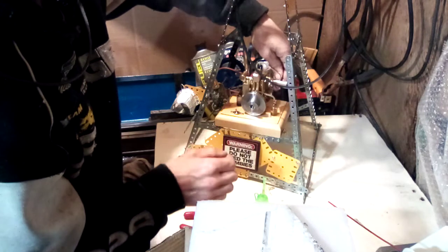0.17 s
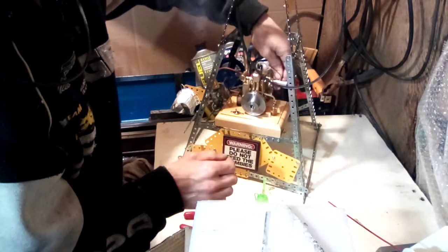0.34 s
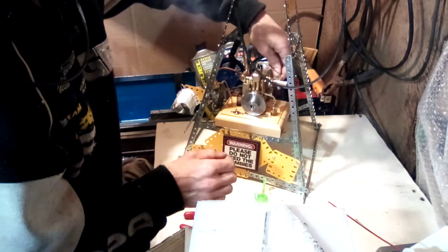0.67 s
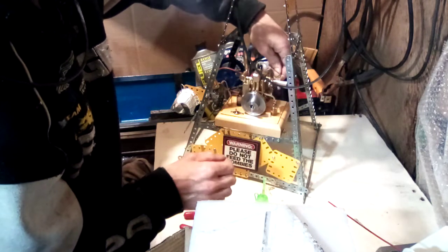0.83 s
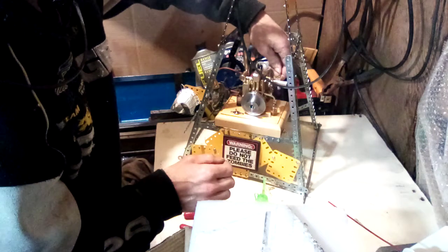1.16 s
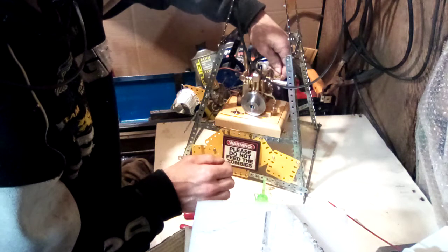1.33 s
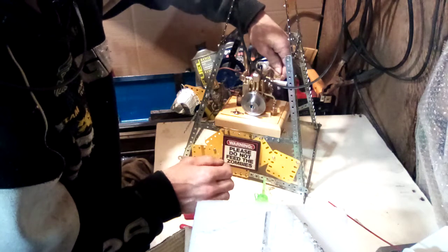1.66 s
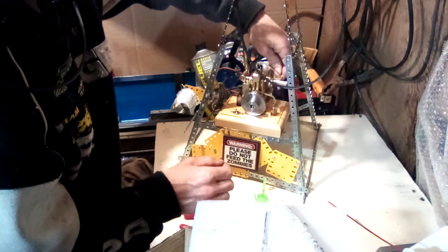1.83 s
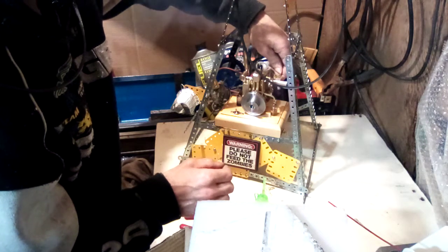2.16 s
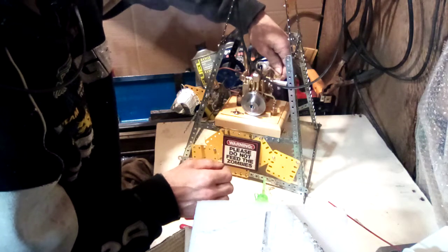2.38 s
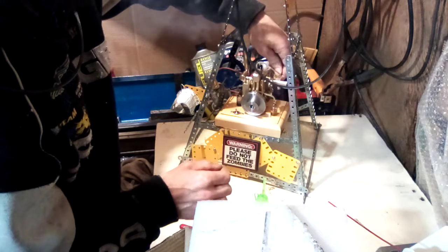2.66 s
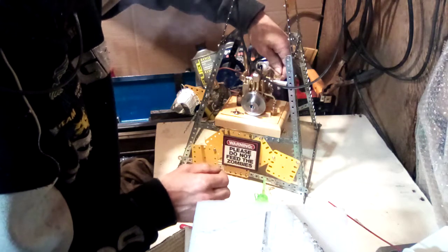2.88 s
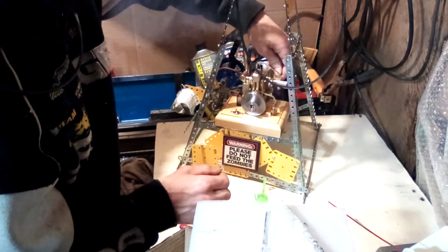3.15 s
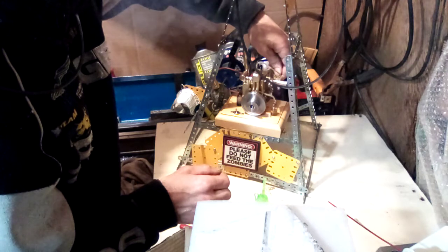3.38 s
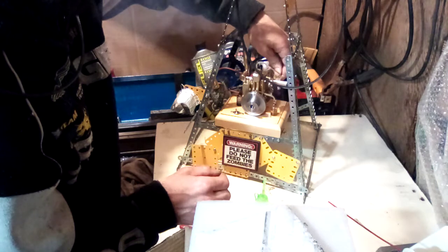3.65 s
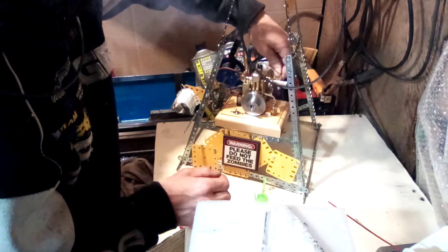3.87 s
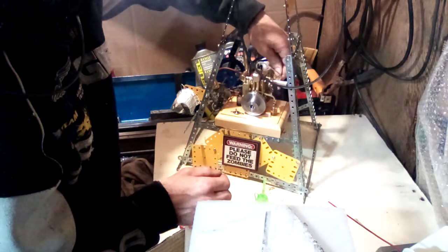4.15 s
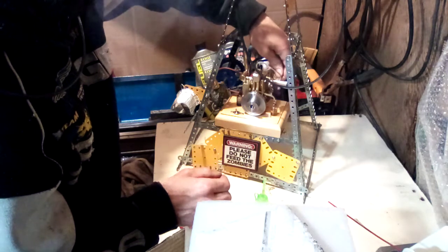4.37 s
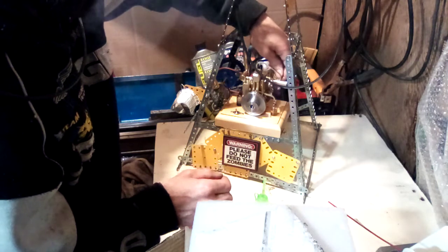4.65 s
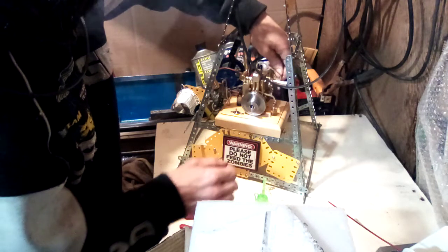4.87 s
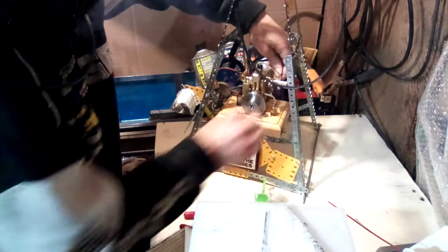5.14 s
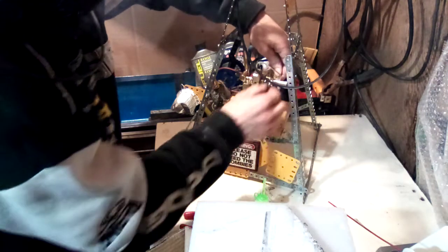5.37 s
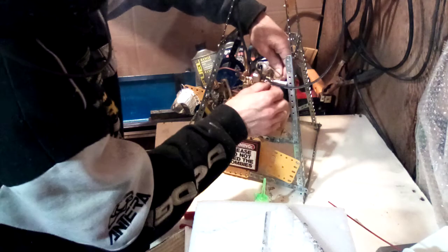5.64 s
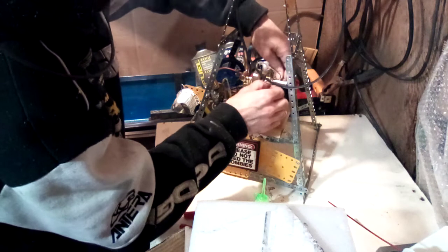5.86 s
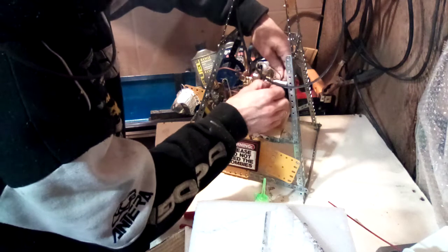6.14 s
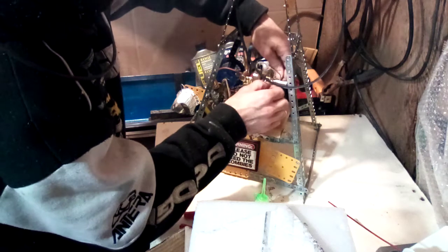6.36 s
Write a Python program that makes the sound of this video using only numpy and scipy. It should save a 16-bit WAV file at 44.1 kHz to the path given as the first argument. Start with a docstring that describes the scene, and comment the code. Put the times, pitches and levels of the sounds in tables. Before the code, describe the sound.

A small model four-stroke engine runs on a workbench, heard close up in a tight workshop corner with short reflections and faint background noise. Each firing gives a sharp, slightly hollow bark with a metallic ring, while the missed cycles only puff and tick. The intake adds a pulsing hum and hiss, and the bench rumbles low underneath. For the first second or so the engine sputters irregularly. From about 1.2 seconds it settles into a faster, more even putter, with brief flurries of rapid firing around 2, 2.8 and 3.7 seconds. The speed sags and the rhythm stumbles around 4.7 seconds. At 5 seconds it stops firing and coasts down with soft, slowing puffs and ticks. At about 5.9 seconds it catches again, giving a few slower, uneven pops until the end at around 6.6 seconds.

```python
"""A model four-stroke engine runs unevenly on a workbench in a tight corner of a workshop.
Each cycle releases a pressure pulse that excites the gas resonances, and the valve rings the metal:
cycles that fire bark sharply, the others only puff and tick. The intake draws air with a hum and a hiss.
Near the end the engine stops firing, coasts down and catches again. The bench rumbles in forced
vibration, and the close walls add early reflections."""
import sys
import numpy as np
from scipy import signal
from scipy.fft import rfft, irfft
from scipy.io import wavfile

SR = 44100
rng = np.random.default_rng(int(sys.argv[2]) if len(sys.argv) > 2 else 0)


def unload_wav(signal):
    """Save mono or channel-first audio to the path in sys.argv[1] as 16-bit WAV at rate SR, clipped to [-1, 1]."""
    wavfile.write(
        sys.argv[1],
        SR,
        np.round(np.clip(np.atleast_2d(signal).T, -1, 1) * 32767).astype(np.int16),
    )


N = 287091
TIME = np.arange(N) / SR
CUTOFF_HZ = 16200
CRUISE_CYCLES_PER_S = 24
# speed laws: (level_at_cruise_db, db_per_doubling_of_speed)
FIRE_PUFF, MISS_PUFF, MISS_RING = (2.16, 3.9), (-7.5, 1.7), (-5.5, -2.5)
HUM_LAW, HISS_LAW, CHUFF_LAW = (-21.5, 15.6), (-45, 5.8), (-37.5, 0)
HOOT_LAW, SPIT_LAW = (-23.5, -7.5), (-35, 1.4)


def from_db(db):
    """Decibels to amplitude ratio."""
    return 10 ** (np.asarray(db) / 20)


def curve(rows, at):
    """Linear interpolation in a two-column table."""
    return np.interp(at, *np.transpose(rows))


def uneven(db, scatter_db):
    """Cycle-to-cycle variation: bounded Gaussian scatter of the levels."""
    return db + scatter_db * np.clip(rng.standard_normal(len(db)), -2, 2)


def noise(spectrum):
    """White noise shaped to a spectrum, at rms 1."""
    hz, db = np.transpose(spectrum)
    bins_hz = np.maximum(np.arange(N // 2 + 1) * SR / N, 1)
    gain = from_db(np.interp(np.log(bins_hz), np.log(hz), db))
    shaped = irfft(rfft(rng.standard_normal(N)) * gain, N)
    return shaped / np.sqrt(np.mean(shaped ** 2) + 1e-20)


def resonate(x, hz, width_hz):
    """A damped resonator with unit peak gain."""
    r = np.exp(-np.pi * width_hz / SR)
    feedback = [1, -2 * r * np.cos(2 * np.pi * hz / SR), r * r]
    return signal.lfilter(np.array([1, 0, -1]) * (1 - r * r) / 2, feedback, x)


def soften(x, cut_hz):
    """A second-order low-pass."""
    return signal.sosfilt(signal.butter(2, cut_hz, fs=SR, output="sos"), x)


def clicks(times, db):
    """One impulse at each time."""
    out = np.full(N + SR, 1e-18)
    out[np.round(times * SR).astype(int)] = from_db(db)
    return out[:N]


def strikes(times, db, cut_hz):
    """Rounded pulses: the longer a pulse, the less treble it holds."""
    return soften(clicks(times, db), cut_hz)


def since(times):
    """Index of the latest event at each sample, and its age in seconds."""
    latest = np.maximum(np.searchsorted(times, TIME) - 1, 0)
    return latest, np.maximum(TIME - times[latest], 0)


# spells of one firing rhythm: start_s, firings, cycles_per_firing, speed_change_share_per_cycle
FIRING_SPELLS = [(0.0147, 1, 4, -0.04), (0.2151, 1, 3, -0.036), (0.3737, 2, 2, 0.015),
                 (0.5813, 1, 3, -0.027), (0.7323, 2, 2, 0.029), (0.922, 1, 3, -0.026),
                 (1.0592, 2, 2, 0.012), (1.237, 10, 2, 0.0064), (2.0161, 2, 1, 0.0028),
                 (2.0871, 10, 2, 0.00032), (2.789, 5, 1, -0.0065), (2.9673, 9, 2, -0.0011),
                 (3.6091, 1, 2, 0.025), (3.6839, 1, 1, 0.004), (3.7203, 11, 2, -.0062),
                 (4.6223, 2, 1, -.01), (4.7053, 1, 3, -.023), (4.8337, 2, 2, -.012),
                 (5.0024, 1, 15, -.0331), (5.8816, 1, 2, -.032), (6.0326, 1, 2, -0.0056),
                 (6.174, 1, 3, -0.045), (6.3747, 1, 2, -0.0049), (6.5, 1, 2, 0)]

def cycles(last_end_s=6.62):
    """Period is the inverse of speed: exhaust valve opening times, and whether each cycle fires."""
    times, fires = [], []
    ends = [row[0] for row in FIRING_SPELLS[1:]] + [last_end_s]
    for (start, firings, every, change), end in zip(FIRING_SPELLS, ends):
        cycle = np.arange(firings * every)
        period = 1 / (1 + change * cycle)
        times.extend(start + (end - start) * (np.cumsum(period) - period) / period.sum())
        fires.extend(cycle % every == 0)
    return np.array(times), np.array(fires)


def by_speed(law, times):
    """Amplitude follows a power law of engine speed: the level in dB at these times."""
    cruise_db, db_per_doubling = law
    starts, _ = cycles()
    speed = np.interp(times, (starts[1:] + starts[:-1]) / 2, 1 / np.diff(starts))
    return cruise_db + db_per_doubling * np.log2(speed / CRUISE_CYCLES_PER_S)


# spectrum of the workshop's background: frequency_hz, density_db
BACKGROUND_SPECTRUM = [(50, -23.5), (150, 4.5), (300, 11), (800, -1.5), (1500, -5.5), (3500, -15.5),
                       (7000, -20.5), (9000, -72), (16000, -48)]

def background():
    """Stationary broadband noise sets the room's noise floor."""
    return from_db(-45.5) * noise(BACKGROUND_SPECTRUM)


# modes of the bench top: pitch_hz, width_hz, level_db
BENCH_MODES = [(113, 47, 25), (164, 19, 26.5)]
# low modes of the engine's frame: pitch_hz, width_hz, level_db
FRAME_MODES = [(61.8, 20.5, -3.5), (84.8, 38, 4.5), (138.6, 26, -1), (166.3, 41, 3)]
# spectrum of the bench's rumble: frequency_hz, density_db
RUMBLE_SPECTRUM = [(20, -45), (40, -58), (58, 2), (80, -0.5), (100, 4.5), (125, 1), (150, -3.5),
                   (175, -6.5), (210, -11.5), (400, -35), (2000, -48)]
# strength of the bench's shaking: time_s, level_db
BENCH_SHAKE = [(0.0, -44.5), (1.34, -37.5), (2.95, -47), (3.02, -40.5), (3.78, -44), (4.78, -40.5),
               (5.83, -50.5), (5.87, -45), (6.46, -43), (6.5, -41)]

def bench(starts, fired):
    """Forced vibration: every firing kicks the bench and every cycle rocks it, over a faint rumble."""
    kicks = strikes(fired, by_speed(FIRE_PUFF, fired) - 14, cut_hz=162)
    thud = sum(from_db(db) * resonate(kicks, hz, width) for hz, width, db in BENCH_MODES)
    rocks = strikes(starts, 54.5, cut_hz=162)
    drone = sum(from_db(db) * resonate(resonate(rocks, hz, width), hz, width)
                for hz, width, db in FRAME_MODES)
    rumble = from_db(-1) * noise(RUMBLE_SPECTRUM)
    return thud + from_db(curve(BENCH_SHAKE, TIME)) * (drone + rumble)


def workshop(x, t60_s, wet_db):
    """Reverberation: a diffuse tail sets in after 6 ms and decays exponentially."""
    age = TIME[:SR // 2]
    onset = np.clip((age - .006) / 0.00067, 0, 1)
    tail = rng.standard_normal(len(age)) * from_db(-60 * age / t60_s) * onset
    return x + from_db(wet_db) * signal.fftconvolve(x, tail / np.linalg.norm(tail))[:N]


# reflections from bench, frame and near walls: delay_ms, signed_gain
REFLECTIONS = [(0.82, 0.16), (1.07, 0.7), (1.4, -0.34), (1.87, 0.42), (3.02, 0.33), (4.05, -0.42),
               (4.28, -0.42), (5.48, -0.59), (6.24, -0.15), (6.5, 0.58), (8.68, 0.086), (9.81, 0.079),
               (10.82, -0.3), (12.01, 0.047)]

def corner(x, dull_hz):
    """Comb filtering: duller copies from close, hard surfaces interfere with the direct sound."""
    dull = soften(x, dull_hz)
    samples = np.arange(N)
    return x + sum(gain * np.interp(samples + 2 - ms * SR / 1000, samples, dull, left=0)
                   for ms, gain in REFLECTIONS)


def intake_hum(inlet, phase, pitch_hz):
    """Helmholtz resonance: drawn air hums like a bottle, at a slightly different pitch each stroke."""
    stroke, _ = since(inlet)
    hz = pitch_hz * (1 + 0.0075 * rng.standard_normal(len(inlet)))[stroke]
    swell = np.exp(-((phase - 0.33) / 0.23) ** 2)   # loudest in mid-stroke
    tone = swell * np.sin(2 * np.pi * np.cumsum(hz) / SR)
    return soften(resonate(tone, pitch_hz, width_hz=164), cut_hz=6900)


# spectrum of the inlet valve's chuff: frequency_hz, density_db
CHUFF_SPECTRUM = [(500, -29), (2800, -2.5), (4300, -10.5), (5000, -3), (5450, 8), (6200, -24), (7000, 2),
                  (7600, -6), (8200, -23.5), (10200, -13.5), (11500, -63), (16000, -36)]

def inlet_chuff(inlet, t60_s):
    """A flow transient: each opening of the inlet valve starts an exponentially decaying noise."""
    openings = clicks(inlet, by_speed(CHUFF_LAW, inlet))
    decay = signal.lfilter([1], [1, -from_db(-60 / (t60_s * SR))], openings)
    return soften(decay, cut_hz=2100) * noise(CHUFF_SPECTRUM)   # the valve lifts gradually


# spectrum of the intake hiss: frequency_hz, density_db
HISS_SPECTRUM = [(300, -5), (1000, 7.5), (1270, 9.5), (1520, -1), (2030, 10), (2300, 7), (3600, 6),
                 (4500, -5), (5500, -7), (6200, -2), (7500, -7), (8200, -33), (10000, -24), (14500, -18)]
# intake air flow over one cycle: cycle_share, level_db
INTAKE_FLOW = [(0, 1), (0.206, 7), (0.231, 10.5), (.3, -2.5), (.45, 5), (.62, -1.5), (.8, -15), (1, 1)]
# how freely the intake draws, choked while the engine coasts: time_s, level_db
THROTTLE_OPENING = [(0, 1), (.6, -1), (2, -1), (3, -0.5), (4.3, -2.5), (5, -2), (5.35, -5.5), (5.8, -16),
                    (6.2, -9), (6.5, -9)]

def intake(starts):
    """Flow noise grows with speed and throttle: returns the hum, and the hiss with the valve's chuff."""
    phase = np.interp(TIME, starts, np.arange(len(starts))) % 1
    inlet = starts[:-1] + .215 * np.diff(starts)   # opens after the exhaust stroke
    throttle_db = curve(THROTTLE_OPENING, TIME)
    hum = from_db(by_speed(HUM_LAW, TIME) + throttle_db) * intake_hum(inlet, phase, pitch_hz=820)
    hiss_db = by_speed(HISS_LAW, TIME) + 0.56 * throttle_db + curve(INTAKE_FLOW, phase)
    hiss = from_db(hiss_db) * noise(HISS_SPECTRUM)
    return hum, hiss + inlet_chuff(inlet, t60_s=0.034)


# notes of the emptied cylinder: start_hz, end_hz, level_db, length_s
CYLINDER_NOTES = [(793.6, 832, 2, 0.074), (694, 735, -4.5, 0.088), (603, 652, 0, 0.051)]

def cylinder_hoot(fired, glide_s, swell_s):
    """Cavity resonance: the cylinder rings on after a firing, its notes climbing as the piston rises."""
    _, age = since(fired)
    notes = 0
    for start_hz, end_hz, db, length_s in CYLINDER_NOTES:
        turns = end_hz * age - (end_hz - start_hz) * glide_s * (1 - np.exp(-age / glide_s))
        notes += from_db(db - 60 * (age / length_s) ** 2) * np.sin(2 * np.pi * turns)
    swell = 1 - np.exp(-(age / swell_s) ** 2)
    return from_db(by_speed(HOOT_LAW, TIME)) * swell * notes


# how hard the charge burns: time_s, crack_db, ring_db
BURN_STRENGTH = [(0, -15.5, -0.5), (.5, -35, 2.5), (.75, -35, 3), (1, -20.5, -1), (1.601, -22, -1.5),
                 (2.6, -18.5, 1), (2.95, -22, -2), (3.5, -17, 3.5), (3.8, -19, -1), (4.6, -17.5, -1),
                 (4.999, -19.5, -0.5), (5.9, -38, -4), (6.5, -31, -3.5)]

def burn(fired):
    """Combustion strength sets each firing's exhaust crack and metal ring, in dB."""
    time_s, crack_db, ring_db = np.transpose(BURN_STRENGTH)
    return np.interp(fired, time_s, crack_db), np.interp(fired, time_s, ring_db)


# misses in which a little charge still burns: time_s, boost_db
PARTIAL_BURNS = [(1.98, 7), (2.19, 6), (3.65, 6.5)]

def partial_burn(missed):
    """Incomplete combustion strengthens a few misses: extra dB for each miss."""
    index = np.arange(len(missed))
    return sum(db * (index == np.argmin(abs(missed - time_s))) for time_s, db in PARTIAL_BURNS)


# modes of the engine's metal: pitch_hz, width_hz, fire_db, miss_db
METAL_MODES = [(2552.6, 43.6, 21, -1), (2574, 69, 5, 17.5), (2717, 50, 21, 1), (3110, 33, -44, 11.5),
               (5490, 100, 12.5, 1.5), (5570, 91, -4, -14)]

def metal_ring(fired, missed, ring_db):
    """Impact excitation: each valve lift strikes the metal's modes, more gently after a miss."""
    miss_ring_db = by_speed(MISS_RING, missed) + partial_burn(missed)
    ring = 0
    for hz, width, fire_db, miss_db in METAL_MODES:
        hard = strikes(fired, uneven(ring_db + fire_db, scatter_db=3.0), cut_hz=6340)
        soft = strikes(missed, uneven(miss_ring_db + miss_db, scatter_db=2.4), cut_hz=4150)
        ring += resonate(hard + soft, hz, width)
    return ring


def jet(times, spectrum, level_db, rise_s, t60_s, tail_db, tail_t60_s, whistle_db):
    """Turbulent bursts that trail off, each stressing its own band near the spectrum's peak."""
    turbulence, out = noise(spectrum), np.zeros(N)
    age = TIME[:SR // 10]
    decay = from_db(-60 * age / t60_s) + from_db(tail_db - 60 * age / tail_t60_s)
    envelope = (1 - np.exp(-age / rise_s)) * decay
    peak_hz, _ = max(spectrum, key=lambda point: point[1])
    bands_hz = np.minimum(peak_hz * np.exp(rng.normal(0, 0.19, len(times))), CUTOFF_HZ)
    for start, db, band_hz in zip((times * SR).astype(int), level_db, bands_hz):
        burst = turbulence[start:start + len(age)] * envelope[:N - start]
        whistle = from_db(whistle_db) * resonate(burst, band_hz, width_hz=600)
        out[start:start + len(burst)] += from_db(db) * (burst + whistle)
    return out


# spectrum of the exhaust's crack: frequency_hz, density_db
CRACK_SPECTRUM = [(300, -9), (1000, -18), (2000, 3), (3300, 0.5), (4600, -1), (5600, 7), (6600, -1.5),
                  (7500, -1.5), (8200, -12), (12000, -59)]
# spectrum of the exhaust's bright spit: frequency_hz, density_db
SPIT_SPECTRUM = [(5000, -1), (8200, -9.5), (9300, -3.5), (10300, 3.5), (11500, -2), (12300, -1.5),
                 (13200, -9), (14000, -3), (15400, 1.5), (17000, -15)]

def exhaust_jets(fired, crack_db):
    """Jet noise: hot gas bursts through the valve gap with a short crack and a brighter spit."""
    crack_db = uneven(crack_db, scatter_db=1.0)
    spit_db = uneven(by_speed(SPIT_LAW, fired), scatter_db=3.8)
    crack = jet(fired, CRACK_SPECTRUM, crack_db, rise_s=0.00019, t60_s=0.015,
                tail_db=-30, tail_t60_s=0.047, whistle_db=-16)
    spit = jet(fired, SPIT_SPECTRUM, spit_db, rise_s=0.000073, t60_s=0.038,
               tail_db=-18, tail_t60_s=0.053, whistle_db=5.5)
    return crack, spit


# gas resonances of cylinder and exhaust: pitch_hz, width_hz, fire_db, miss_db
GAS_MODES = [(475.5, 166.5, 18, 17), (590, 86, 8.5, 14.5), (733, 55, 18.5, 2), (824.7, 37, 21, 16),
             (1193, 56, 9, 13.5), (1802, 385, 8, 7.5)]

def exhaust_bark(fired, missed):
    """Pulse excitation: a steep pulse after a firing, a soft one after a miss, rings the gas modes."""
    steep = strikes(fired, uneven(by_speed(FIRE_PUFF, fired), scatter_db=0.6), cut_hz=2770)
    puff_db = by_speed(MISS_PUFF, missed) + partial_burn(missed)
    soft = strikes(missed, uneven(puff_db, scatter_db=0.36), cut_hz=1440)
    return sum(resonate(from_db(fire_db) * steep + from_db(miss_db) * soft, hz, width)
               for hz, width, fire_db, miss_db in GAS_MODES)


def scene():
    """Superposition of the room's background, the bench's vibration and the engine's airborne sound."""
    starts, fires = cycles()
    fired, missed = starts[fires], starts[~fires]
    crack_db, ring_db = burn(fired)
    crack, spit = exhaust_jets(fired, crack_db)
    hum, drawn_air = intake(starts)
    hoot = cylinder_hoot(fired, glide_s=0.014, swell_s=0.015)
    engine = drawn_air + metal_ring(fired, missed, ring_db) + crack + exhaust_bark(fired, missed)
    airborne = workshop(corner(engine, dull_hz=6400) + hum + spit + hoot, t60_s=0.091, wet_db=-11.5)
    return (background() + bench(starts, fired) + airborne)[None]


def record(dry):
    """Soft saturation rounds the highest peaks; a steep low-pass cuts the top treble."""
    ceiling = 0.62
    rounded = ceiling * np.tanh(dry / ceiling)
    return signal.sosfilt(signal.ellip(10, .1, 80, CUTOFF_HZ, fs=SR, output="sos"), rounded)


dry = scene()
out = record(dry)
unload_wav(out)
```